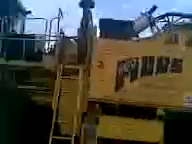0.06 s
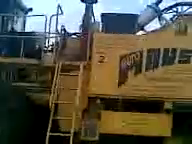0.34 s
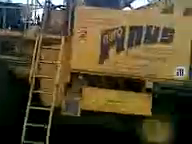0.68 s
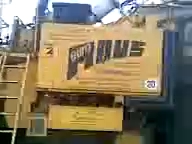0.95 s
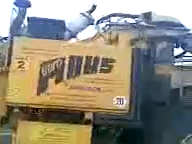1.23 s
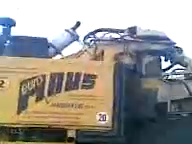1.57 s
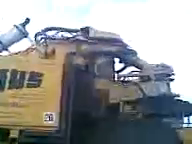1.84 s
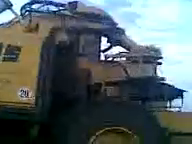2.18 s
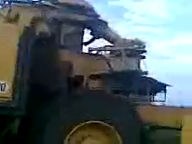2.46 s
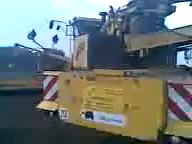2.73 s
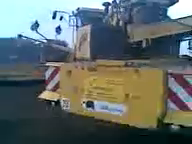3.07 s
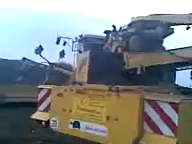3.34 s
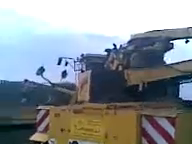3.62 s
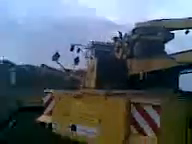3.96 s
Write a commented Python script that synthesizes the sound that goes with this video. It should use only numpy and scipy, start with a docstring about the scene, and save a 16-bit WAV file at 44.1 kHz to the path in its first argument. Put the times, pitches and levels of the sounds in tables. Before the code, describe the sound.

A big diesel farm machine roars and clatters, with whines, hissing and steel knocks.

```python
"""A walk along a big beet loader running at steady working speed. First the six-cylinder diesel roars
and clatters, with loose steel rattling. Near 1 s the engine bay comes alongside: air hisses and squeals,
steel knocks, and the whines of fan, gears and pump swell. At 2.7 s a cluster of hard knocks leads to
the rear, where the treble falls away to a dull roar, a low drone, a hollow resonance and soft thumps.
All of it is heard through a small, narrow-band recorder that overloads on the loudest peaks."""
import sys
import numpy as np
from scipy import signal
from scipy.fft import rfft, irfft
from scipy.io import wavfile

SR = 44100
rng = np.random.default_rng(int(sys.argv[2]) if len(sys.argv) > 2 else 0)


def inscribe(sig):
    """Save sig as 16-bit PCM at rate SR to the path in sys.argv[1].

    A 1-D sig is mono; a 2-D sig holds one channel per row.
    Samples are clipped to [-1, 1] before scaling.
    """
    pcm = np.round(np.clip(np.atleast_2d(sig).T, -1, 1) * 32767)
    wavfile.write(sys.argv[1], SR, pcm.astype(np.int16))


N = 176400
T = np.arange(N) / SR
FIRING_HZ = 85.0

# Fader rides for the diesel's roar, side panels, open bay and firing tones: time_s, level_db
ROAR_RIDE = [(0, -24.5), (.7, -25.5), (.9, -21.5), (1.2, -18.5), (1.55, -20.5), (1.75, -23), (2.1, -24),
             (2.65, -23.5), (2.9, -28), (3.1, -28), (3.35, -42), (4, -36)]
PANEL_RIDE = [(0, -28), (.27, -31.5), (.39, -24.5), (.6, -28.5), (2.1, -28), (2.9, -30), (3.2, -47)]
BAY_RIDE = [(0, -54), (.7, -29.5), (.9, -29), (1.25, -24.5), (1.55, -25), (1.8, -39), (2.6, -43.5),
            (2.85, -29), (3.2, -44.5), (4, -51.5)]
FIRING_RIDE = [(0, 0), (.7, -2), (1.2, 9), (1.6, 4.5), (2, 0.5), (2.6, -1.5), (2.9, 1.5), (3.3, -13),
               (4, -18)]
# EQ curves of the roar, panels and bay: frequency_hz, gain_db
ROAR_EQ = [(20, -39.5), (50, -15.5), (85, -16), (160, -6.5), (300, -3), (440, -5.5), (620, 5), (900, -1.5),
           (1300, 1.5), (1700, -2.5), (2200, -3.5), (2800, -16), (3600, -19), (4000, -22.5), (4500, -47)]
PANEL_EQ = [(500, -29), (680, -6.5), (1050, -10), (1200, 4), (1330, -6.5), (2500, -44)]
BAY_EQ = [(300, -39), (900, -6), (2250, -1.5), (2650, -3.5), (3200, 1), (3800, -3.5), (4500, -26.5)]
# Firing tones, ahead of their fader: firing_multiple, level_db
FIRING_HARMONICS = [(1, -52.5), (2, -50), (9, -45.5), (14, -40.5), (15, -39), (17, -41), (20, -43)]

# Fader rides for the whines and hums of the turning parts: time_s, level_db
PUMP_RIDE = [(0, -38), (1.6, -33.5), (3.201, -39.5), (3.45, -50)]
PUMP_OCTAVE_RIDE = [(0, -47.5), (0.901, -35), (1.22, -36.5), (1.29, -27), (1.6, -25), (2.049, -30),
                    (2.18, -25.5), (2.58, -26), (2.72, -38), (2.95, -36.5), (3.3, -47)]
DRIVE_RIDE = [(0, -44.5), (2.5, -48.5), (4, -38.5)]
FAN_RIDE = [(0, -30), (.5, -35.5), (.7, -44), (.88, -26), (1.08, -28.5), (1.16, -20.5), (1.4, -25),
            (1.6, -21.5), (1.8, -32), (2.3, -39), (2.97, -30), (3.4, -54.5), (4, -41.5)]
GEAR_RIDE = [(0, -49), (.7, -35.5), (1.25, -24.5), (1.851, -39.5), (3, -61.5)]
UPPER_GEAR_RIDE = [(0, -57), (2.451, -35.5), (3, -59)]
LOW_HUM_RIDE = [(0, -55), (1.15, -35.5), (2.05, -43), (2.15, -35), (2.599, -41), (2.8, -52)]
HUM_RIDE = [(0, -32.5), (1, -44), (1.18, -27.5), (1.58, -25.5), (1.9, -38), (2.2, -32.5), (2.95, -34.5),
            (3.15, -54.5)]
ENGINE_WHINE_RIDE = [(0, -40.5), (.6, -31.5), (1.25, -30), (1.75, -34), (2, -28), (2.48, -28), (2.65, -45),
                     (4, -56)]
# Fan overtones, relative to the fan's main tone: pitch_multiple, gain_db
FAN_HARMONICS = [(2, -17.5), (3, -11.5)]

# Fader rides for the air's hiss and squeal: time_s, level_db
HISS_RIDE = [(0, -34), (.76, -35.5), (.84, -21), (.94, -27.5), (1.15, -24), (1.45, -24.5), (2, -37),
             (2.7, -33), (3.05, -34.5), (3.3, -46.5)]
SQUEAL_RIDE = [(.62, -40.5), (.8, -28), (1.5, -30.5), (2, -43), (3.3, -51)]
# EQ curve of the hiss: frequency_hz, gain_db
HISS_EQ = [(1500, -40.5), (2900, -17), (3250, -7.5), (3420, -2), (3670, -1), (3850, -15), (4500, -29.5)]
# Flares of the squeal: start_s, peak_db, start_pitch_hz, end_pitch_hz
FLARE_CUES = [(0.782, -18, 3585, 3516), (0.811, -15.5, 3523, 3420), (.852, -17, 3485, 3530),
              (.982, -19, 3480, 3493), (1.11, -14.5, 3496, 3330), (1.146, -20, 3600, 3614)]

# Fader rides for the dull roar and low drone at the rear: time_s, level_db
REAR_RIDE = [(2.6, -29.5), (2.8, -26.5), (3.4, -33), (3.65, -33), (3.8, -30)]
DRONE_RIDE = [(2.6, -52), (2.76, -30.5), (3, -36), (3.55, -39), (3.74, -35.5), (4, -40.5)]
# EQ curves of that roar and drone: frequency_hz, gain_db
REAR_EQ = [(20, -35), (90, -5.5), (190, -3.5), (430, 1), (600, -10.5), (1250, 0.5), (1780, -0.5),
           (2080, -15.5), (2700, -13), (3400, -13), (4500, -39)]
DRONE_EQ = [(60, -27.5), (200, -16.5), (260, -0.5), (320, 1.5), (900, -42.5)]
# Hollow resonance at the rear: time_s, centre_hz, level_db
HOLLOW_SWEEP = [(2.649, 800, -42), (2.78, 820, -28.5), (2.87, 830, -19.5), (2.972, 780, -27.5),
                (3.35, 900, -33.5), (3.551, 950, -32), (3.739, 1060, -33.5), (3.852, 1280, -36)]

# Knocks of loose steel: start_s, level_db, ring_hz
KNOCK_CUES = [(1.139, -7.5, 620), (1.412, -18, 1450), (2.6885, -9.5, 800), (2.692, -7.5, 750),
              (2.7004, -4, 1470), (2.7051, -6.5, 600), (2.869, -14.5, 850), (2.938, -14, 640),
              (3.51, -27, 1000), (3.562, -22, 930), (3.744, -16, 904), (3.881, -24, 1300)]
# Low thumps at the rear: crest_s, peak_db, pitch_hz
THUMP_CUES = [(2.702, -16, 295), (2.778, -27, 290), (2.835, -23.5, 304), (2.872, -20.5, 289),
              (2.908, -22, 330.3), (3.17, -21.5, 281.4), (3.51, -25.5, 332), (3.762, -25, 296.3),
              (3.883, -22, 351), (3.957, -26, 355.2)]
# Thin ticks: start_s, peak_db
TICK_CUES = [(1.137, -27), (1.411, -24.5), (1.467, -34.5), (2.7018, -18), (2.706, -29.5)]
# EQ curves of a knock's attack and of a tick: frequency_hz, gain_db
KNOCK_EQ = [(30, -20), (310, 0.5), (750, 0.5), (1450, 4.5), (2200, -6.5), (2800, -14.5), (3600, -10.5),
            (4500, -29)]
TICK_EQ = [(2000, -26), (4500, 0), (7000, -3), (15000, -14)]


def diesel(clock):
    """Combustion roar, ringing panels and bay clatter pulse to one firing rhythm, over the firing tones."""
    firing = throb(clock)
    roar = fader(ROAR_RIDE) * rush(ROAR_EQ, firing, surge_db=1.5, surge_hz=18)
    panels = fader(PANEL_RIDE) * rush(PANEL_EQ, firing, surge_db=3.9, surge_hz=45.6)
    bay = fader(BAY_RIDE) * rush(BAY_EQ, firing, surge_db=3.3, surge_hz=24.8)
    tones = sum(amp(db) * shaft_tone(clock, k * FIRING_HZ, flutter=.3) for k, db in FIRING_HARMONICS)
    return roar + panels + bay + fader(FIRING_RIDE) * tones


def whines(clock, pump_hz=283.1, drive_hz=355.8, fan_hz=639.8, gear_hz=1501.5, upper_gear_hz=1803.5):
    """Pump, drive, fan, gears and engine each sing out as the listener passes them."""
    parts = [(pump_hz, PUMP_RIDE), (2 * pump_hz, PUMP_OCTAVE_RIDE),
             (drive_hz, DRIVE_RIDE), (fan_hz, FAN_RIDE),
             (gear_hz, GEAR_RIDE), (upper_gear_hz, UPPER_GEAR_RIDE),
             (6 * FIRING_HZ, LOW_HUM_RIDE), (7 * FIRING_HZ, HUM_RIDE),
             (18 * FIRING_HZ, ENGINE_WHINE_RIDE)]
    fan_edge = sum(amp(db) * shaft_tone(clock, k * fan_hz, flutter=.59) for k, db in FAN_HARMONICS)
    tones = sum(fader(ride) * shaft_tone(clock, hz, flutter=.15) for hz, ride in parts)
    return tones + fader(FAN_RIDE) * fan_edge


def air(clock, squeal_hz=3486, wander_hz=25.2, sputter_db=3):
    """Air hisses in a narrow band from the engine bay, with a sputtering squeal inside it."""
    hiss = rush(HISS_EQ, throb(clock), surge_db=2.5, surge_hz=69.5)
    pitch_hz = squeal_hz + wander_hz * drift(top_hz=50.1)
    sputter = amp(sputter_db * drift(top_hz=50.1))
    squeal = unit(sputter * np.sin(phase(pitch_hz)))
    return fader(HISS_RIDE) * hiss + fader(SQUEAL_RIDE) * squeal


def squeal_flares(length_s=.035, waver_hz=33.7):
    """The squeal catches in short, rough flares that slide in pitch."""
    out = np.zeros(N)
    waver = waver_hz * drift(top_hz=130)
    for start_s, db, start_hz, end_hz in FLARE_CUES:
        progress = np.clip((T - start_s) / length_s, 0, 1)
        pitch_hz = start_hz + (end_hz - start_hz) * progress + waver
        out += amp(db) * np.sin(np.pi * progress) * np.sin(phase(pitch_hz))
    return out


def rear(clock):
    """The back of the machine: a duller roar, a low drone and a hollow resonance climbing with the walk."""
    time_s, centre_hz, db = np.transpose(HOLLOW_SWEEP)
    hollow = amp(np.interp(T, time_s, db)) * resonance(np.interp(T, time_s, centre_hz), width_hz=250)
    treble_filter = signal.butter(2, 2000, "high", fs=SR, output="sos")
    hollow -= signal.sosfiltfilt(treble_filter, hollow)
    drone = fader(DRONE_RIDE) * rush(DRONE_EQ, throb(clock), surge_db=1.5, surge_hz=21)
    roar = fader(REAR_RIDE) * rush(REAR_EQ, throb(clock), surge_db=.1, surge_hz=23)
    return roar + drone + hollow


def rattle(taps_per_s=180, spread_db=1.2, decay_s=.0025, trim_db=-12.5):
    """Vibrating steel taps at random, tucked under the side and rear roars on their EQs and faders."""
    strikes = rng.random(N) < taps_per_s / SR
    strength = amp(spread_db * np.minimum(rng.exponential(1, N), 3))
    envelope = signal.lfilter([1], [1, -np.exp(-1 / (SR * decay_s))], strikes * strength)
    taps = envelope * rng.standard_normal(N)
    return amp(trim_db) * (fader(ROAR_RIDE) * eq(taps, ROAR_EQ) + fader(REAR_RIDE) * eq(taps, REAR_EQ))


def knocks(burst_s=.0044, ring_s=.006, ring_db=-2.5, size=4096):
    """Dead clunks of loose steel: a rough burst and a brief ring at the pitch of the struck part."""
    out = np.zeros(N + size)
    lead_in = size // 4  # room for the EQ to spread ahead of the hit
    t = (np.arange(size) - lead_in) / SR
    for start_s, db, ring_hz in KNOCK_CUES:
        burst = eq(rng.standard_normal(size) * (t >= 0) * np.exp(-(t / burst_s) ** 2), KNOCK_EQ)
        ring = (t >= 0) * np.exp(-abs(t) / ring_s) * np.sin(2 * np.pi * ring_hz * t)
        at = round(start_s * SR) - lead_in
        out[at:at + size] += amp(db) * (burst / abs(burst).max() + amp(ring_db) * ring)
    return out[:N]


def thumps(half_length_s=.0082):
    """Loose steel at the rear booms in soft, rounded pulses."""
    out = np.zeros(N)
    for crest_s, db, pitch_hz in THUMP_CUES:
        swell = np.exp(-((T - crest_s) / half_length_s) ** 2)
        out += amp(db) * swell * np.sin(2 * np.pi * (pitch_hz * T + rng.random()))
    return out


def ticks():
    """Thin, sharp ticks, cued at a few loud moments."""
    clicks = np.zeros(N)
    for start_s, db in TICK_CUES:
        clicks[round(start_s * SR)] = amp(db)
    bright = eq(clicks, TICK_EQ)
    return bright * clicks.max() / abs(bright).max()


def throb(clock, cylinders=6, depth=.25, unevenness=.6):
    """One slight swell for each firing; the cylinders differ in strength."""
    firings = FIRING_HZ * clock
    strength = 1 + unevenness * unit(rng.standard_normal(cylinders))
    return 1 + depth * strength[firings.astype(int) % cylinders] * np.sin(np.pi * firings) ** 4


def rush(curve, pulse, surge_db, surge_hz):
    """Pulsing, gently surging turbulence, coloured by the body it passes through."""
    return eq(rng.standard_normal(N) * pulse * amp(surge_db * drift(surge_hz)), curve)


def shaft_tone(clock, hz, flutter):
    """The tone of a turning part; shifting reflections make its level and phase flutter."""
    reflections = 1 + flutter * (drift(top_hz=6.3) + 1j * drift(top_hz=2.8))
    return unit((reflections * np.exp(2j * np.pi * (hz * clock + rng.random()))).real)


def resonance(centre_hz, width_hz):
    """Noise ringing around a moving centre; rms 1."""
    pole = np.exp(-np.pi * width_hz / SR)
    noise = rng.standard_normal(N) + 1j * rng.standard_normal(N)
    envelope = signal.lfilter([1], [1, -2 * pole, pole * pole], noise)
    return unit((envelope * np.exp(1j * phase(centre_hz))).real)


def drift(top_hz):
    """Smooth random motion that rolls off above top_hz; rms 1."""
    bins_hz = np.fft.rfftfreq(2 * N, 1 / SR)
    return unit(irfft(rfft(rng.standard_normal(2 * N)) / (1 + (bins_hz / top_hz) ** 4))[:N])


def eq(x, curve):
    """Colours a sound with an EQ curve; rms 1."""
    hz, db = np.transpose(curve)
    bins_hz = np.fft.rfftfreq(len(x), 1 / SR)
    gain = amp(np.interp(np.log(bins_hz + 1), np.log(hz), db))
    return unit(irfft(rfft(x) * gain, len(x)))


def fader(ride):
    """Gain over time along a fader ride."""
    return amp(np.interp(T, *np.transpose(ride)))


def phase(hz):
    """Running phase of a moving pitch, in radians."""
    return 2 * np.pi * np.cumsum(hz) / SR


def amp(db):
    """Decibels to gain."""
    return 10 ** (np.asarray(db) / 20)


def unit(x):
    """Scales to rms 1."""
    return x / np.sqrt(np.mean(x ** 2) + 1e-20)


def scene():
    """The mono mix; all turning parts follow one slightly wandering shaft."""
    shaft_speed = 1 + .001202 * drift(top_hz=1.19)
    clock = np.cumsum(shaft_speed) / SR
    machine = diesel(clock) + whines(clock) + air(clock) + squeal_flares() + rear(clock)
    return (machine + rattle() + knocks() + thumps())[None]


def record(dry):
    """Soft overload and a telephone-like treble cut, then thin ticks on top and a last high cut."""
    knee, headroom = .46, .32
    band_hz, high_cut_hz = 4500, 15850
    clipped = np.clip(dry, -knee, knee)
    saturated = clipped + headroom * np.tanh((dry - clipped) / headroom)
    band = signal.firwin(511, band_hz, window=("kaiser", 9), fs=SR)[None]
    high_cut = signal.firwin(511, high_cut_hz, window=("kaiser", 9), fs=SR)[None]
    narrow = signal.oaconvolve(saturated, band, "same")
    return signal.oaconvolve(narrow + ticks(), high_cut, "same")


dry = scene()
out = record(dry)
inscribe(out)
```